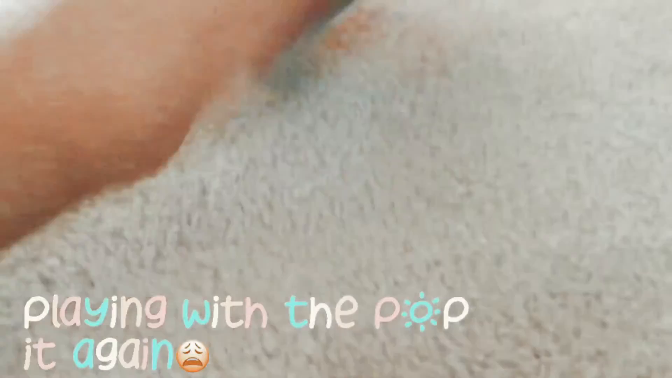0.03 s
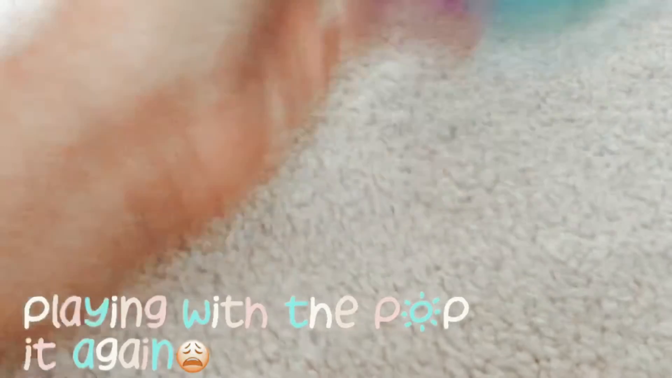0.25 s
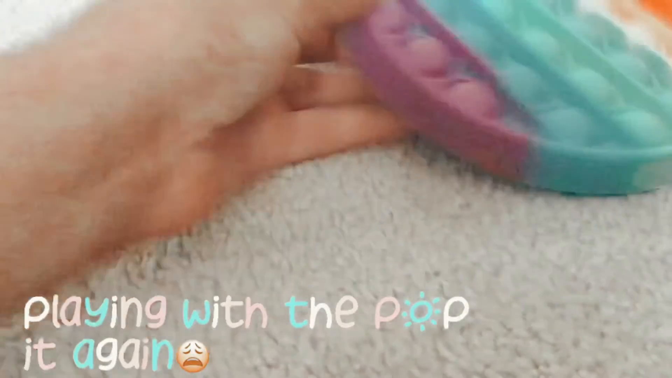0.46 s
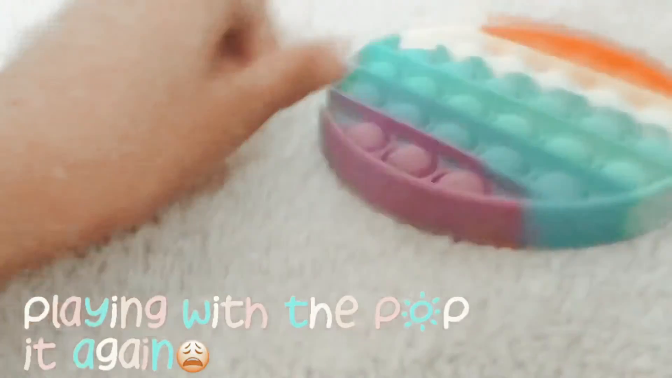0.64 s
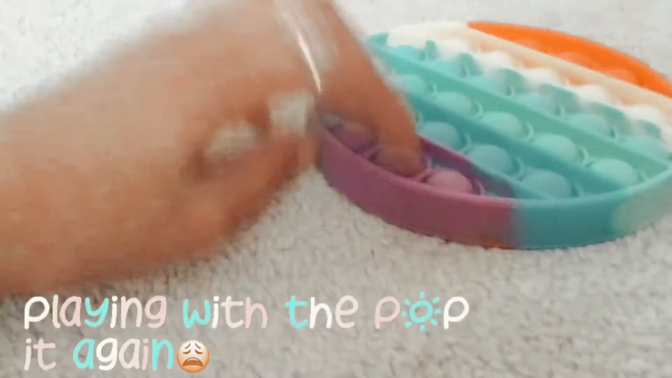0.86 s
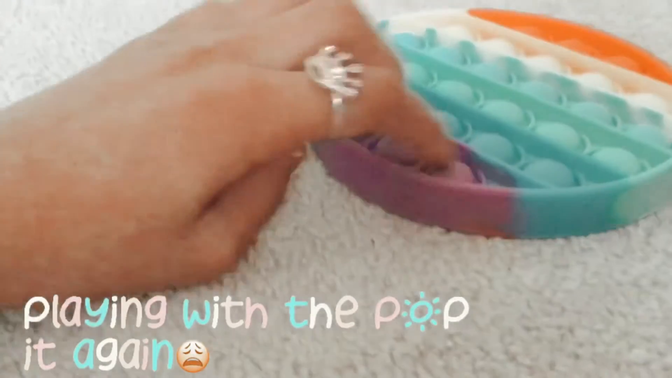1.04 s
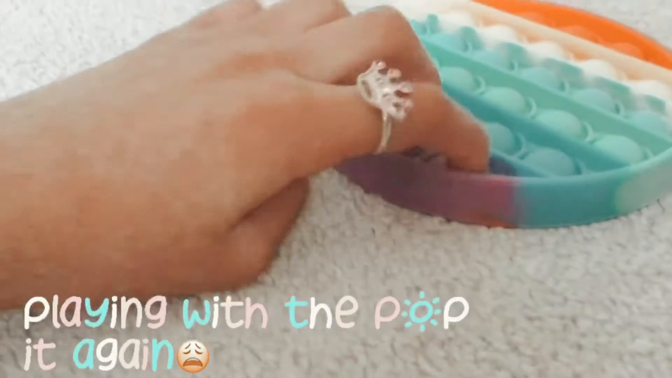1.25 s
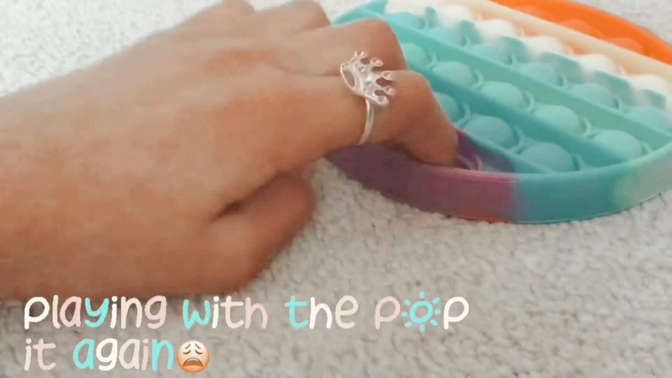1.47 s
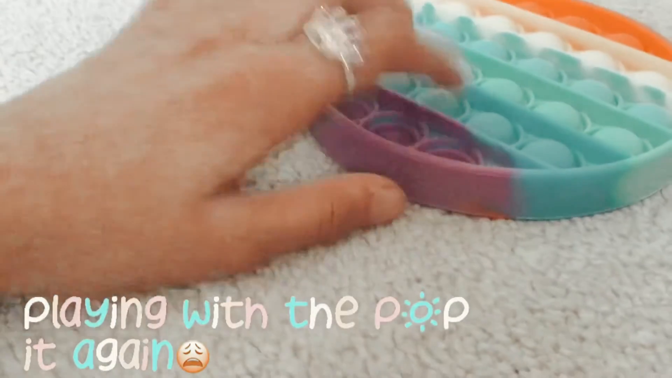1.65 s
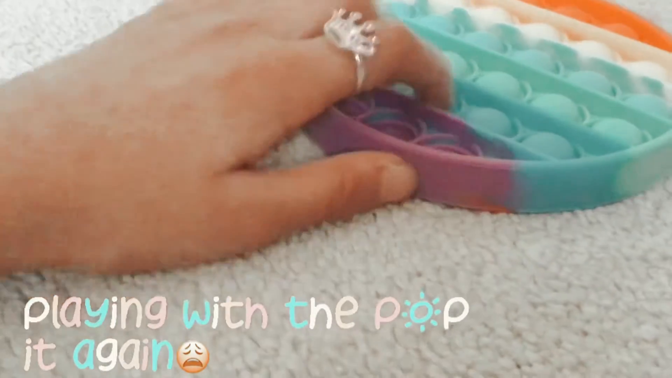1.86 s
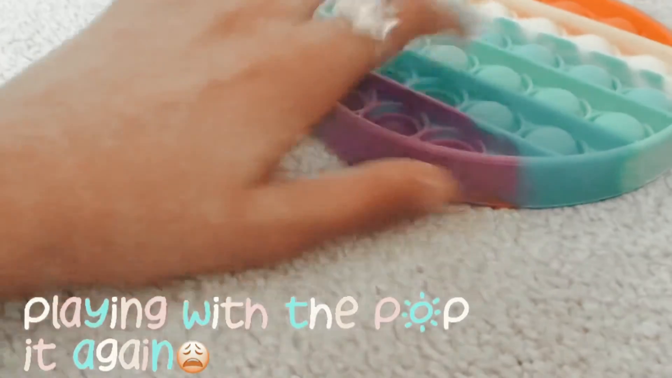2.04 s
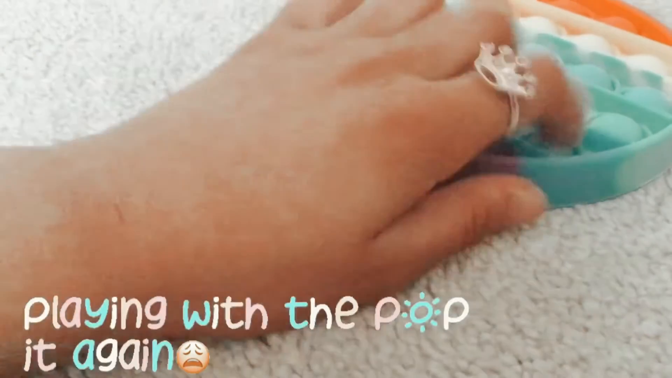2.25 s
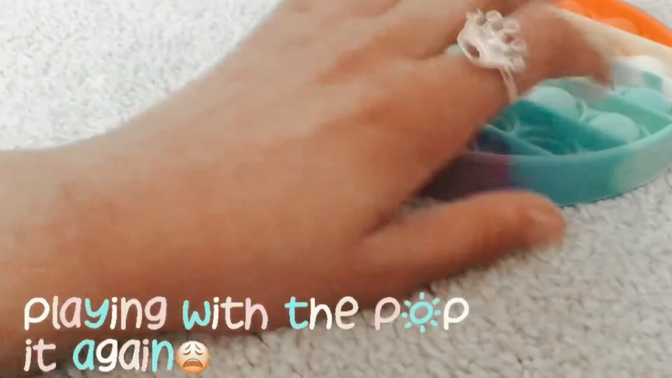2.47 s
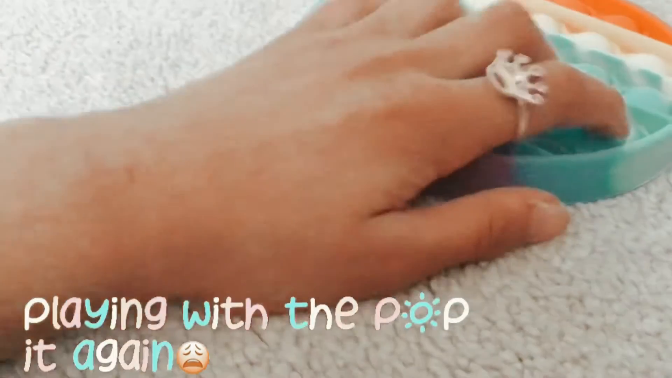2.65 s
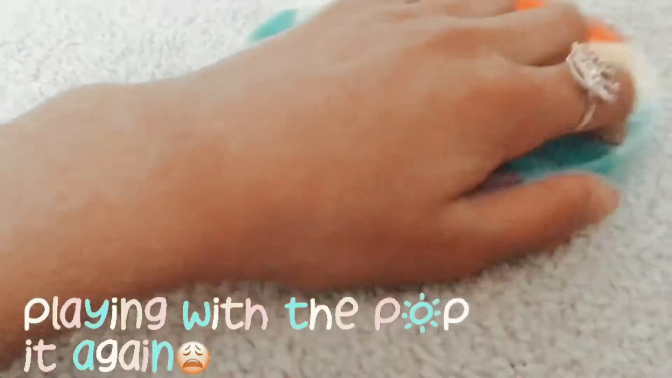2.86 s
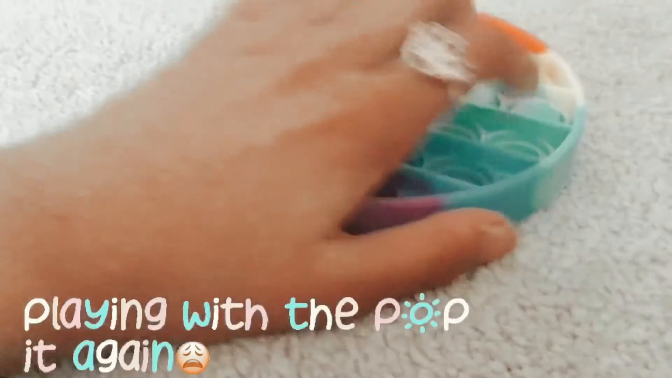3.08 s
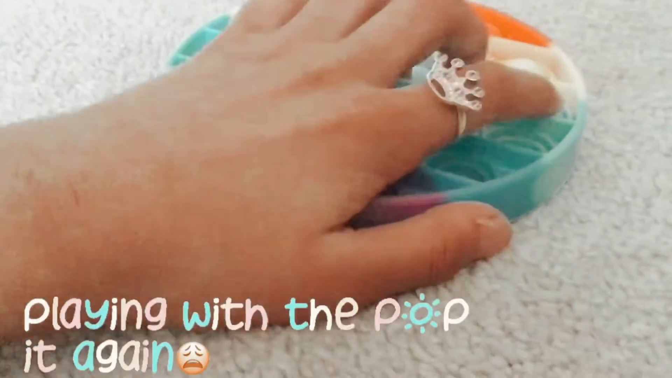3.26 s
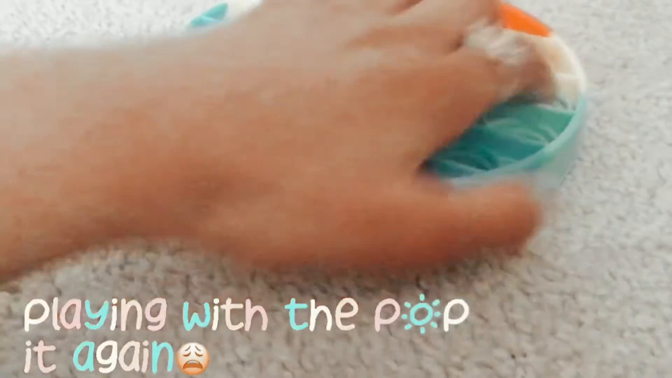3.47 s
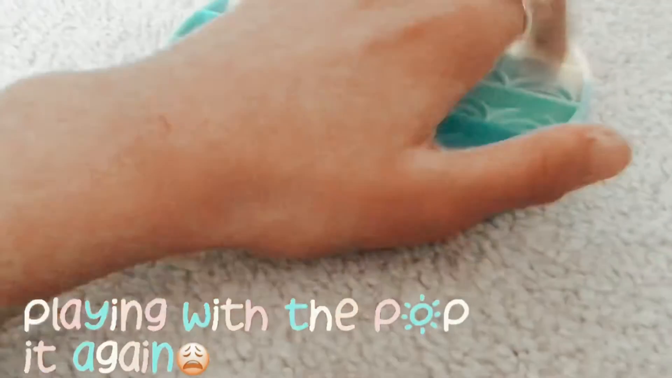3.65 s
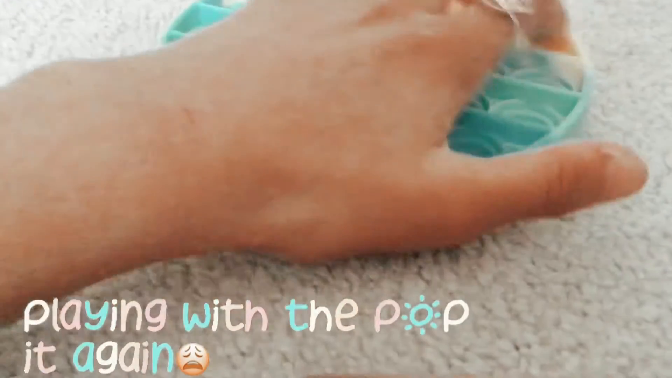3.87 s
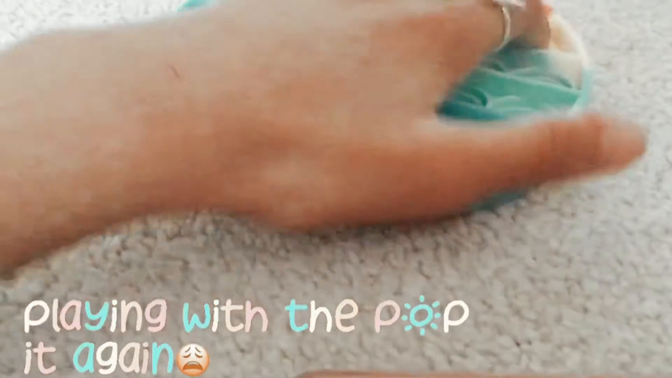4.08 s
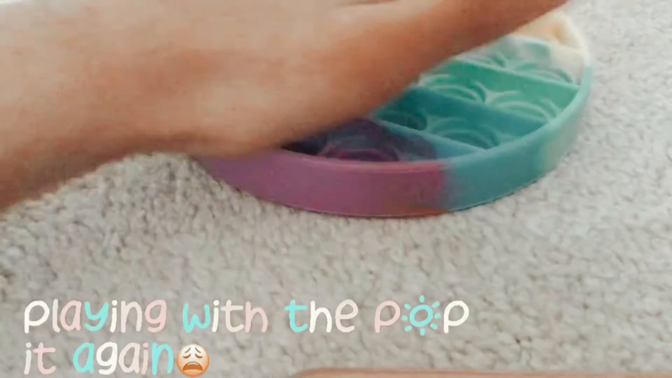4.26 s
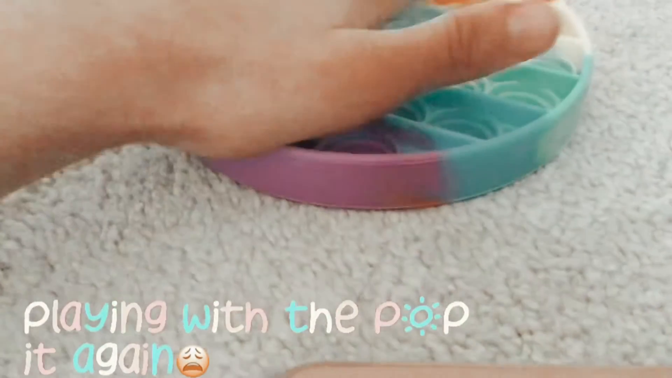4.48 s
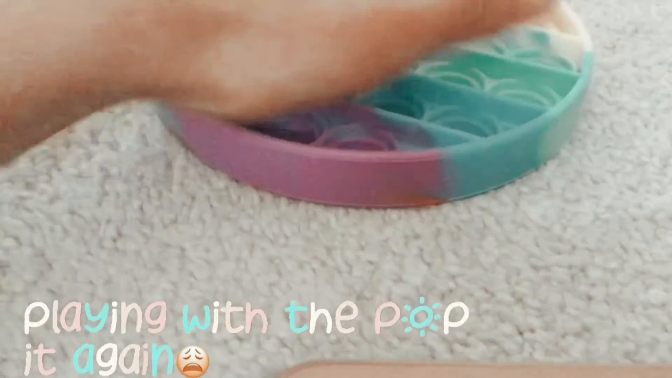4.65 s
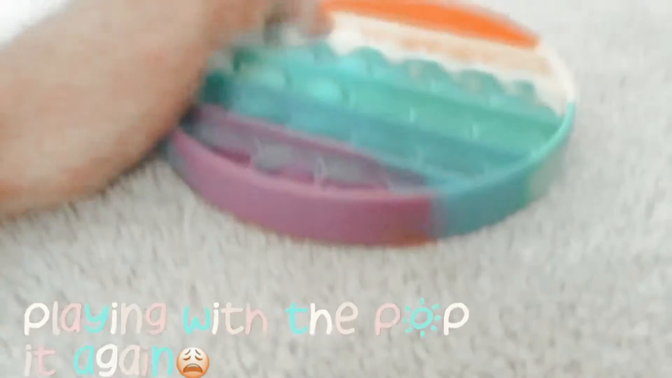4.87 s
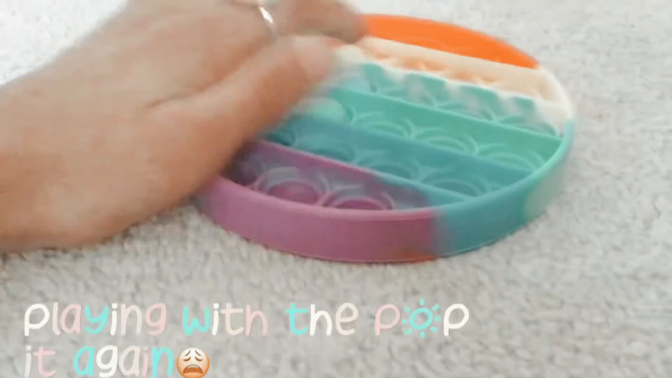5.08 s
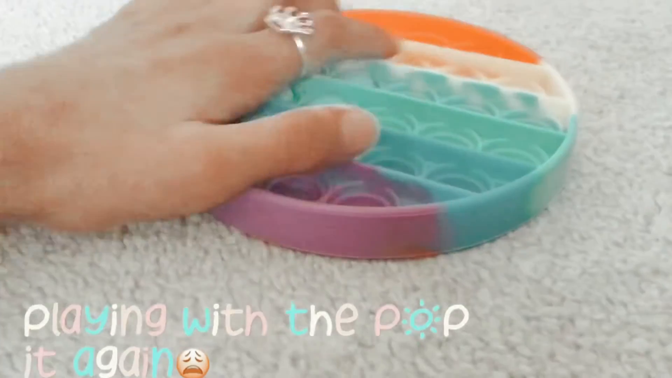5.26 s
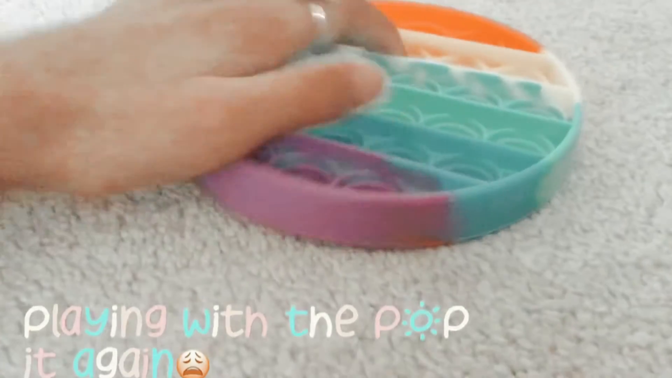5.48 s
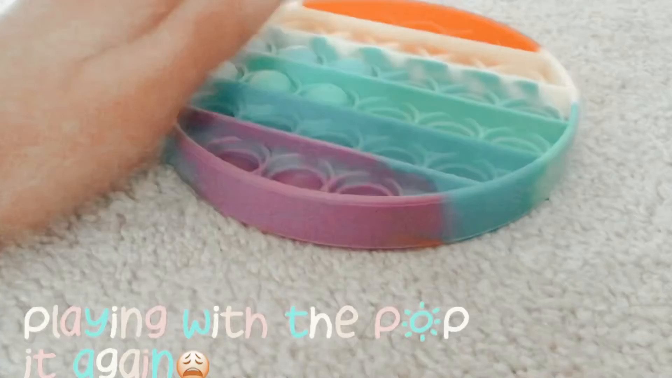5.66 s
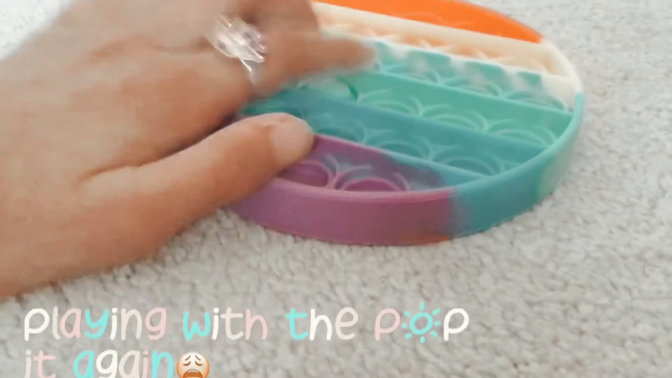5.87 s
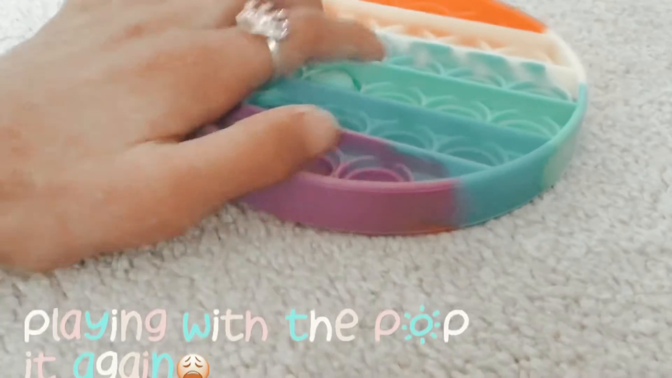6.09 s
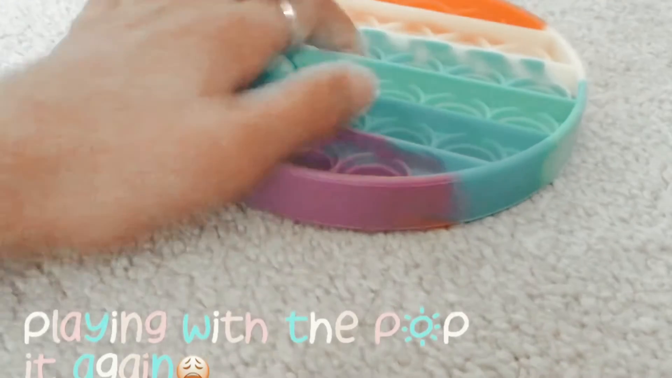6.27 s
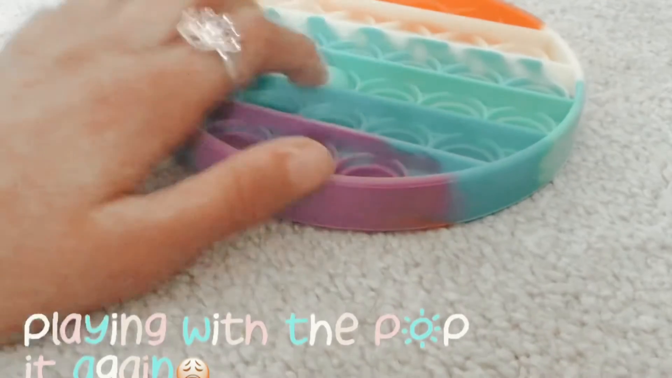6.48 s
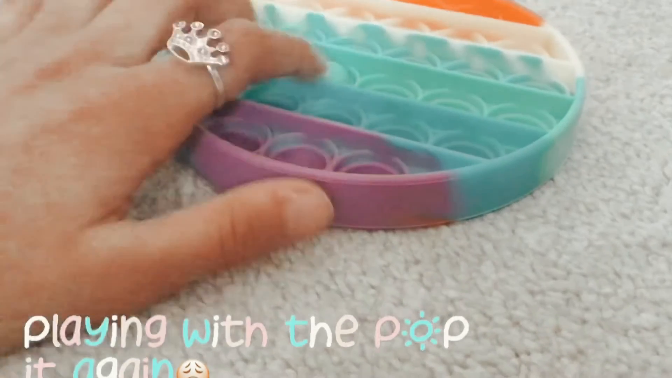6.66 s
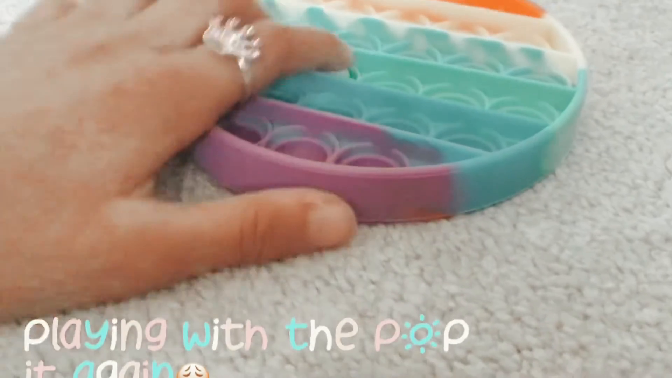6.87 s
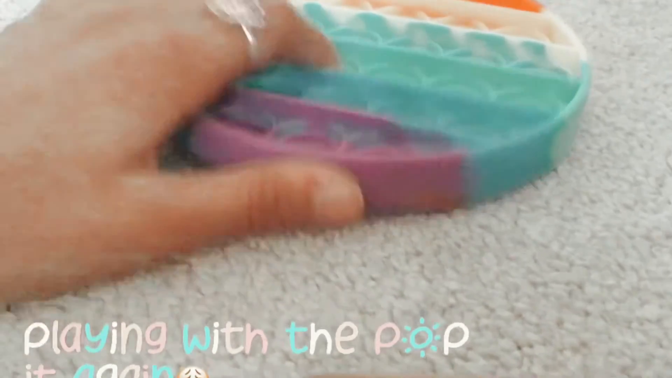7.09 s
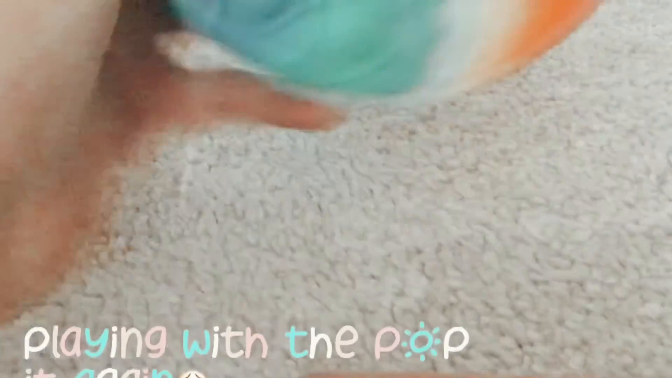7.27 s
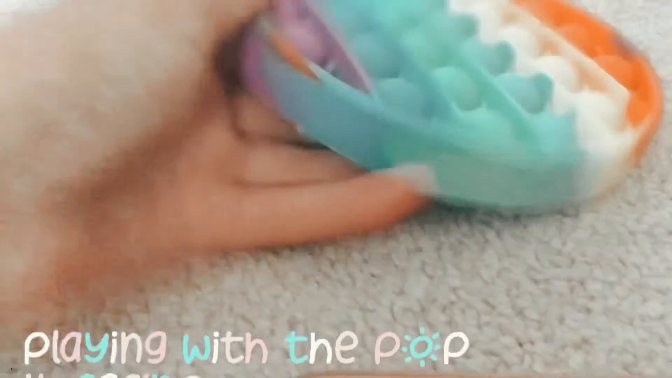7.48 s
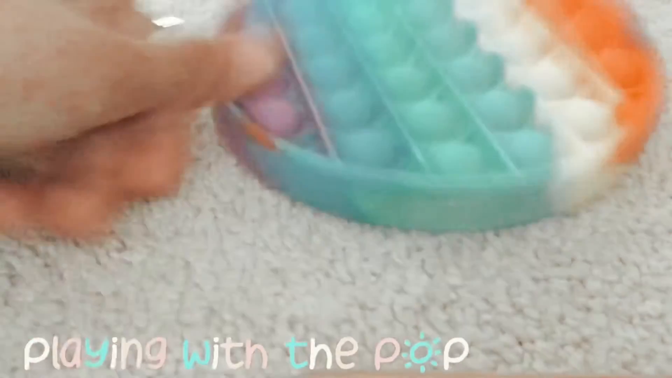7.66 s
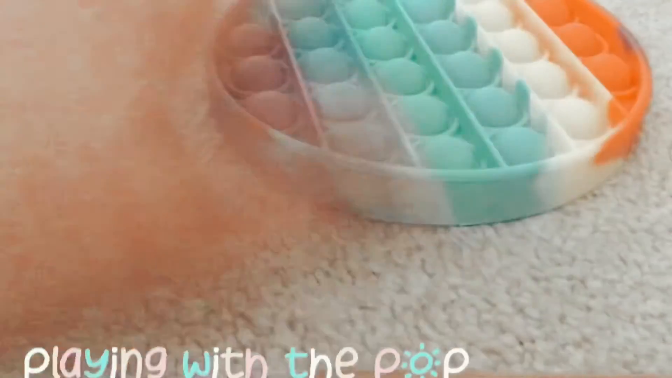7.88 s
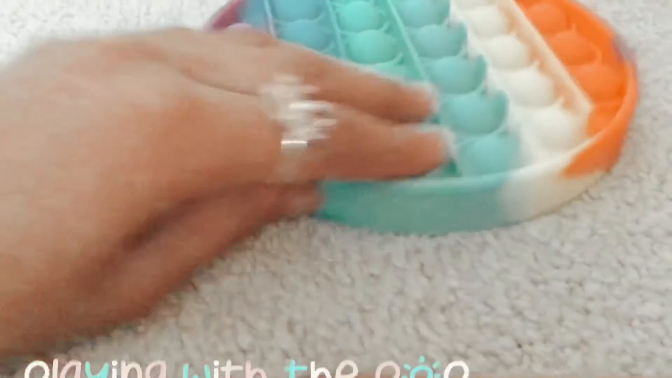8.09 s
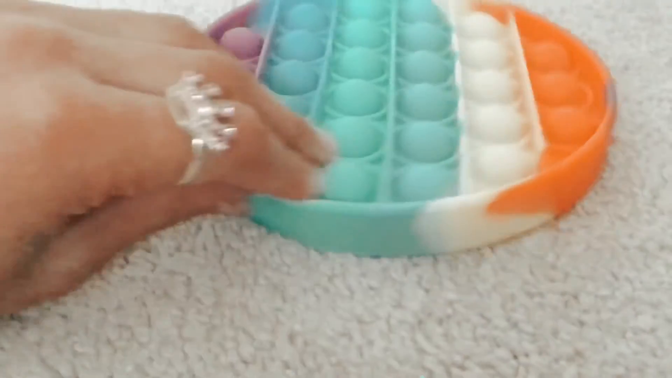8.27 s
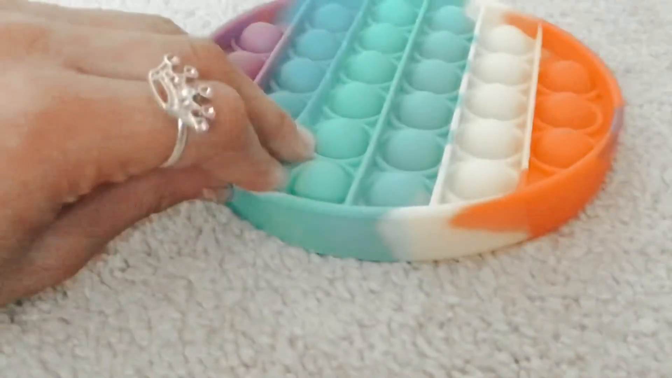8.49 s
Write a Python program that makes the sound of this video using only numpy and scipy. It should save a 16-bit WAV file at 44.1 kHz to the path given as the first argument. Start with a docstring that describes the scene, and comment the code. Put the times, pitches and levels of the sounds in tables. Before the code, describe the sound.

Fingers press a rubber bubble toy, making short, snappy plops in uneven clusters, with padded thuds on carpet in a quiet room.

```python
"""Silicone bubble toy on a carpet

Fingers press in the domes of the toy, close to a phone. Each dome flips with a crack of its wall
and a short falling plop, a few with a thin tick on top. Hand and toy brush the pile and bump
the carpet. A small soft room answers over a low, lumpy hum and microphone hiss."""
import sys
import numpy as np
from scipy import signal
from scipy.io import wavfile
from scipy.ndimage import uniform_filter1d

SR = 44100
rng = np.random.default_rng(int(sys.argv[2]) if len(sys.argv) > 2 else 0)


def file_out(sig):
    """Save sig as 16-bit WAV at sys.argv[1]."""
    # one column per channel
    cols = np.atleast_2d(sig).T
    # limit, then scale
    lim = np.clip(cols, -1, 1)
    pcm = np.round(lim * 32767).astype(np.int16)
    wavfile.write(sys.argv[1], SR, pcm)


N = 376173


def amp(db):
    """Decibels to gain."""
    return 10 ** (np.asarray(db) / 20)


def unit_rms(x):
    """Scales to rms 1."""
    return x / np.sqrt(np.mean(x ** 2) + 1e-20)


def curve_at(points, hz):
    """Reads a curve on a log frequency axis."""
    f, value = np.transpose(points)
    return np.interp(np.log(hz + 1), np.log(f + 1), value)


def add(mix, s, sound):
    """Mixes a sound in at s seconds."""
    part = mix[round(s * SR):][:len(sound)]
    part += sound[:len(part)]


def patchy_noise(spectrum, patchy_db, size=512, smooth_hz=9000.):
    """Coloured noise with drifting loud and soft patches that even out above smooth_hz."""
    hz = np.fft.rfftfreq(size, 1 / SR)
    real, imag, patches = rng.standard_normal((4 * N // size + 5, len(hz), 3)).T
    patches = unit_rms(uniform_filter1d(uniform_filter1d(patches, size=6, axis=0), size=10, axis=1))
    drift_db = patchy_db * patches / (1 + (hz[:, None] / smooth_hz) ** 2)
    frames = (real + 1j * imag) * amp(curve_at(spectrum, hz)[:, None] + drift_db)
    return unit_rms(signal.istft(frames, nperseg=size, noverlap=3 * size // 4)[1][:N])


def ring(modes, drive, swing=-1):
    """Damped rubber modes swell and die; neighbours that swing opposite ways leave hollows between."""
    t, out = np.arange(1500) / SR, 0
    for k, (hz, width, db) in enumerate(modes):
        impulse = t * np.exp(-2 * np.pi * width * t) * np.sin(2 * np.pi * hz * t)
        mode = np.convolve(drive, impulse)[:len(t)]
        out = out + swing ** k * amp(db) * mode / abs(mode).max()
    return out


def hum():
    """The bed: a low, lumpy hum with microphone hiss above it."""
    # Each row: frequency in Hz, relative level in dB.
    spectrum = [(18, -45), (33, -32.5), (75, 2), (215, -6), (355, -9.5), (486, -12.5), (600, -11),
                (801, -18), (866, -19.5), (4530, -27.5), (14600, -34), (15600, -49.5)]
    return amp(-64.5) * patchy_noise(spectrum, patchy_db=3., size=1024, smooth_hz=4500.)


def room(x):
    """Early reflections lead into a short tail, each band dying at its own speed."""
    # Each row: frequency in Hz, seconds to fall by 60 dB.
    decay = [(250, 0.21), (4590, 0.2), (10000, 0.16)]
    # Each row: frequency in Hz, reverb level in dB.
    tone = [(150, -7), (600, -11.5), (2000, -14.5), (3400, -12.5), (4500, -14), (5700, -7), (12000, -12)]
    taps = np.zeros(SR // 2)
    at = np.arange(0, len(taps) - 20, 10) + rng.integers(0, 10, (len(taps) - 11) // 10)
    t = at / SR
    early, build = 2.23 * np.exp(-t / 0.0055), np.clip((t - .006) / 0.044, 0, 1)
    ceiling = 1.3 * np.exp(-((t - .018) / 0.0051) ** 2)
    nearest_wall = 0.48 * np.exp(-((t - .0127) / 0.0014) ** 2)
    taps[at] = rng.choice([-1., 1.], len(at)) * (early + build + ceiling + nearest_wall)
    hz, t, bands = signal.stft(taps, SR, nperseg=256)
    bands *= amp(-60 * t / curve_at(decay, hz)[:, None])
    tail = signal.istft(bands, SR, nperseg=256)[1]
    bands *= amp(curve_at(tone, hz))[:, None] / np.linalg.norm(tail)
    return signal.fftconvolve(x, signal.istft(bands, SR, nperseg=256)[1])[:N]


def carpet_strokes():
    """Fibres hiss as they are brushed and rumble as they are crushed; each stroke swells, then stops."""
    # Each row: start, swell and fade in seconds, hiss at the crest in dB, rumble in dB against the hiss.
    strokes = [(0, 0.0075, 0.086, -67, 12.5), (.41, 0.1, 0.13, -65, 0), (.65, 0.079, 0.05, -68, 0.5),
               (1.042, 0.024, 0.17, -77, -2), (1.72, 0.15, .02, -71, 7), (1.96, 0.22, 0.031, -70, 5),
               (2.51, 0.15, 0.087, -66, 4), (2.7, 0.067, 0.072, -59.5, -0.5),
               (2.82, 0.049, 0.11, -68.5, 8.5), (2.994, 0.05, 0.05, -61.5, 1.5),
               (4.76, 0.13, 0.015, -61.5, 0.5), (5.523, 0.15, 0.057, -57.5, 1.5),
               (5.98, 0.078, 0.1, -72.5, 0.5), (6.314, 0.1, 0.095, -59.5, 0),
               (6.52, 0.044, 0.041, -62.5, -2), (6.729, 0.06, 0.055, -74.5, 6.5),
               (7.122, 0.068, 0.13, -61.5, 7), (7.451, 0.046, 0.17, -63, 2), (7.82, 0.12, 0.16, -72.5, 0),
               (7.964, 0.12, 0.23, -63, -6)]
    # Brushed pile, then crushed pile. Each row: frequency in Hz, relative level in dB.
    brushed = [(530, -45.5), (900, -38), (1130, 2), (1550, -6), (3260, -3.5), (5750, -17), (13200, -28.5),
               (16000, -26.5)]
    crushed = [(60, -47.5), (120, 8.5), (300, 1), (700, 5.5), (1200, 0), (2000, -36.5)]
    light_touch_db = -77
    t, brushing, weight = np.arange(N) / SR, np.zeros(N), np.zeros(N)
    for start, rise, fade, db, weight_db in strokes:
        crest, stop = start + rise, start + rise + fade
        edge = np.clip(np.minimum((t - start) / 0.022, (stop - t) / 0.049) + .5, 0, 1)
        droop_db = 0.49 * max(db - light_touch_db, 0)  # both ends sink towards a light touch
        swell = edge * amp(db - droop_db * np.interp(t, [start, crest, stop], [1, 0, 1]) ** 2)
        brushing += swell
        weight += swell * amp(weight_db)
    hiss = brushing * patchy_noise(brushed, patchy_db=2.0, size=256)
    return hiss + weight * patchy_noise(crushed, patchy_db=4.5)


def carpet_bumps():
    """Toy and hand land with a padded, sinking thud; the rim knocks and the floor wobbles on."""
    # Each row: start in seconds, strength in dB, pitch in Hz that the thud falls through.
    landings = [(0.029, -36, 264), (0.33, -25.5, 134), (0.627, -21.5, 217.4), (0.841, -34, 109),
                (1.42, -34.5, 310), (1.783, -31.5, 222), (2.261, -29, 99), (3.996, -28.5, 260),
                (5.676, -34.5, 127.8), (6.446, -32.5, 227), (6.849, -31.5, 137), (7.407, -22, 212),
                (7.632, -29, 246), (7.641, -26.5, 80.3), (7.924, -26, 151), (7.943, -27.5, 137.7)]
    out, t = np.zeros(N), np.arange(6000) / SR
    floor_band = signal.butter(2, [65, 180], "bandpass", fs=SR, output="sos")
    attack = (1 - np.exp(-t / 0.0034)) ** 3
    for s, db, hz in landings:
        pitch = hz * (0.806 + 0.49 * np.exp(-t / 0.015))
        thud = np.sin(2 * np.pi * np.cumsum(pitch) / SR) * amp(-60 * t / 0.05)
        rim = np.sin(2 * np.pi * 480 * t) * amp(-13.5 - 60 * t / 0.0074)
        rumble = unit_rms(signal.sosfilt(floor_band, rng.standard_normal(len(t))))
        wobble = rumble * amp(-12.5 - 60 * t / 0.12)
        add(out, s, amp(db) * attack * (thud + rim + wobble))
    return out


def ticks():
    """A brief scratch rings very high on some flips, perhaps a fingernail."""
    # Each row: start in seconds, strength in dB.
    scratches = [(1.4327, -41), (1.8377, -31.5), (2.232, -59), (6.816, -51)]
    # Each row: frequency in Hz, width in Hz, relative level in dB.
    modes = [(12600, 440, -3), (14260, 530, -5)]
    out = np.zeros(N)
    for s, db in scratches:
        add(out, s, amp(db + 2.5) * ring(modes, rng.standard_normal(20)))
    return out


def wall_crack(t, lead, travel, crack_db, upper_db, fizz_db):
    """The dome's wall slips, snaps and rings. Returns the close crack and the one the room gets."""
    # Each row: frequency in Hz, width in Hz, relative level in dB.
    wall_modes = [(1444, 460, -6), (2400, 250, -10.5), (3390, 550, -9), (5620, 880, -9), (7350, 1100, -10),
                  (9440, 560, -5), (13000, 1500, -18)]
    hz, width, db = np.transpose(wall_modes)
    from_snap_s = abs(t[:300] - t[lead])
    slip_t60_s = 0.0014 / (.2 + .8 * travel)  # a dimple scratches longer
    slips = .55 * rng.standard_normal(300) * amp(-60 * from_snap_s / slip_t60_s)
    slips[lead] += travel  # the clean snap of a full flip
    colour_db = np.interp(hz, [1600, 3600, 5500, 9300], [0.31 * crack_db, crack_db, upper_db, fizz_db])
    taut = 1 + .007 * crack_db * (hz < 4500)  # a harder snap rings higher
    scatter, detune = rng.standard_normal((2, len(hz)))  # no two domes are cast alike
    hz, db = hz * (taut + .035 * detune), db + colour_db + scatter
    crack = ring(zip(hz, width, db), slips)
    blur = 1.45  # averaged over all directions, the modes are wider
    spread = blur * ring(zip(hz, width * blur, db), slips)
    # The crack returns from the far side of the dome, inverted and dulled, and hollows the tone.
    delay_s = 0.00043 / taut[0] * (1 + .04 * scatter[0])
    echo = np.interp(t - delay_s, t, uniform_filter1d(crack, size=5), left=0)
    hollow = 0.65 * np.clip(1 - crack_db / 30, 0, 1)  # hard snaps fill the hollows
    return crack - hollow * echo, spread


def plop(t, travel, hz, crack_db):
    """A short plop whose pitch drops fast; a faint dimple holds its pitch."""
    flip_s, dimple_s = 0.0084 * 600 / hz, 0.014  # higher plops are shorter
    length_s = dimple_s + (flip_s - dimple_s) * travel
    onset_s = 0.00015 * amp(-.4 * np.clip(crack_db, -20, 5))  # a soft flip starts lower and slower
    pitch = hz * (1 + travel * (0.000919 / (t + onset_s) - .2 - 12 * t))
    tone = np.cos(2 * np.pi * (np.cumsum(pitch) / SR - .3))
    attack = (1 - np.exp(-t / (onset_s * (1 + 12 * (1 - travel))))) ** 2
    swell = amp(-5 * np.exp(-(t / .0017) ** 2))  # the air under the dome takes a moment to build
    fade = amp(-60 * (t / length_s) ** 3.38)
    return signal.sosfilt(signal.butter(2, 2118, fs=SR, output="sos"), attack * swell * fade * tone)


def dome_pops():
    """Each pressed dome cracks, plops and shakes the toy. Returns the close sound and the room send."""
    # Each row: time in seconds, level in dB, plop pitch in Hz, then the wall's crack, upper ring
    # and fizz in relative dB.
    presses = [(0.837, -45.5, 680, -43, -6, -27), (1.268, -23, 493, 5, -0.5, -11.5),
               (1.3171, -18.5, 577, 9.5, -1, -14.5), (1.429, -32.5, 595, 4, -4, -19),
               (1.433, -25, 536, 1.5, -7, -14), (1.6112, -45, 625, -5, -11, -17),
               (1.7, -53, 730, -6, -15, -24), (1.7815, -23.5, 523, -12.5, -35, -41),
               (1.8294, -25.5, 620, 1.5, -9, -26), (1.836, -16, 696, -5, -29, -32),
               (1.8381, -25, 633, 4.5, -10, -5.5), (1.8428, -15, 501, -1, -3, -27),
               (1.974, -55.5, 630, 2, -9, -25), (2.123, -48, 766, -6, -10, -14),
               (2.2336, -17, 507, -6, -2, -11.5), (2.2476, -20, 585, 3, 1.5, -8.5),
               (2.5973, -14.5, 610, 2.5, -0.5, -19.5), (2.6746, -16.5, 565, 1.5, -1.5, -19.5),
               (3.142, -51, 670, -14, -16, -24), (3.4057, -19, 578, 3.5, -6, -17),
               (3.4243, -22, 587, 5, -18, -28), (3.4267, -17.5, 670, 8.5, 0.5, -12),
               (3.4333, -20.5, 470, 8, 11, -3.5), (3.732, -56.5, 700, 5, -13, -18),
               (3.866, -47.5, 623, -24, -16.5, -23), (3.982, -42, 570, -5, -16, -16),
               (3.9873, -25.5, 537, -10, -24, -22), (3.9906, -20, 808, 15, 3.5, -6.5),
               (4.0034, -15.5, 610, 1.5, -6, -27.5), (4.0201, -13.5, 653, 2.5, -5, -24),
               (4.1103, -46.5, 520, 5, -9, -13), (4.172, -54, 670, 3, -16, -24.5),
               (4.194, -50, 627, -7, -9, -24), (4.345, -52, 530, -13.5, -19, -29.5),
               (4.5421, -25.5, 492, -17.5, -15, -23.5), (4.5457, -27.5, 890, 22.5, 4.5, 0),
               (4.5504, -23, 750, 0, -25, -24), (4.5601, -19, 616, 10, -18, -18),
               (4.7112, -55, 655, 11, -8, -25), (4.764, -45.5, 666, -2.5, -23, -12),
               (4.853, -40, 563, -2, -17, -37.5), (5.2971, -15.5, 590, 7.5, -16.5, -25),
               (5.3587, -34.5, 636, 4, -13, -37), (5.362, -18, 600, -5, -30, -30),
               (6.116, -11.5, 643, -6.5, -11.5, -30), (6.1423, -14.5, 554, -4.5, -3.5, -31),
               (6.1494, -11, 684, -9, -13, -28.5), (6.441, -41.5, 530, -12, -20, -39.5),
               (6.732, -49.5, 676, -10, -22, -22), (6.809, -35, 644, -9, -25, -32.5),
               (6.817, -14.5, 588, 3, 3, -34), (6.8301, -11.5, 587, -10, -2, -35),
               (6.9131, -12.5, 596, -5, -5.5, -21), (7.632, -48, 490, -23, -22, -32.5),
               (7.922, -57.5, 400, 9, -8, 4), (7.9313, -40.5, 400, -11, -5, -17),
               (7.9352, -41.5, 400, -10, 3, -8)]
    # The whole toy on the carpet. Each row: frequency in Hz, width in Hz, relative level in dB.
    toy_modes = [(268.6, 40.7, -24.5), (400, 96, -13.5)]
    toy = ring(toy_modes, [1.], swing=0.94)
    near, spread, t = np.zeros(N), np.zeros(N), np.arange(1500) / SR
    lead = 12  # samples of creep before the snap
    for s, db, hz, crack_db, upper_db, fizz_db in presses:
        travel = np.clip((db + 57.5) / 16, 0, 1)  # 0 is a faint dimple, 1 a full flip
        body = np.roll(plop(t, travel, hz, crack_db) + toy, lead)
        near_crack, spread_crack = wall_crack(t, lead, travel, crack_db, upper_db, fizz_db)
        add(near, s - .0005, amp(db) * (body + near_crack))
        add(spread, s - .0005, amp(db) * (body + spread_crack))
    return near, spread


def scene():
    """Pops, bumps and ticks sound in the room, over dry brushing and hum."""
    near, spread = dome_pops()
    handling = carpet_bumps() + ticks()
    send = (spread + handling) * np.sqrt(2 / 3)
    # Three sets of reflections take turns, as each dome faces the room its own way.
    turn = np.arange(N) / SR * 37.
    wet = sum(room(send * np.cos(turn + k * np.pi / 3)) for k in range(3))
    return (near + handling + wet + carpet_strokes() + hum())[None]


def record(dry):
    """The microphone loses the deep bass, rounds off the tallest peaks and dulls, then cuts, the top."""
    thin = signal.sosfilt(signal.butter(4, 52, "highpass", fs=SR, output="sos"), dry)
    rounded = .5 * np.tanh(2 * thin)
    dulled = signal.sosfilt(signal.butter(2, 13400, fs=SR, output="sos"), rounded)
    band_limit = signal.firwin(511, 16300, window=("kaiser", 9), fs=SR)
    return signal.oaconvolve(dulled, band_limit[None], "same")


dry = scene()
out = record(dry)
file_out(out)
```